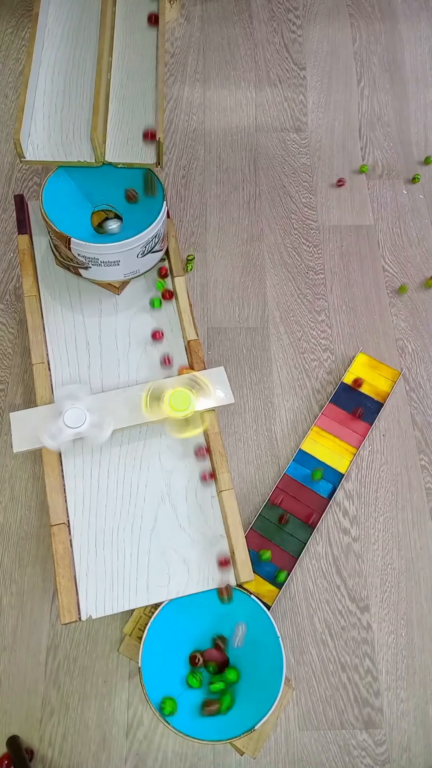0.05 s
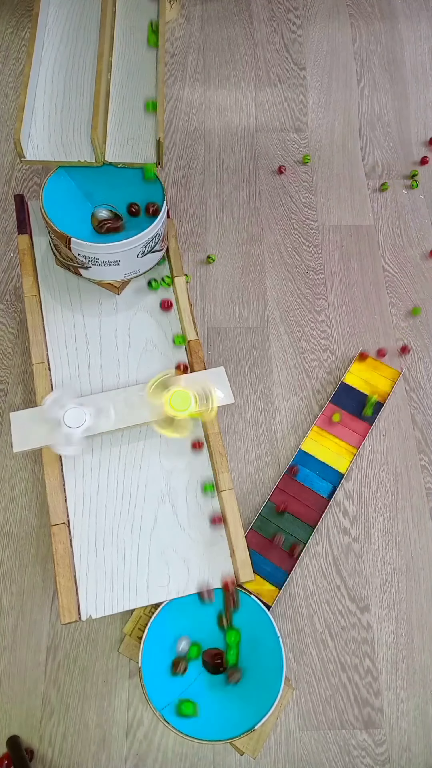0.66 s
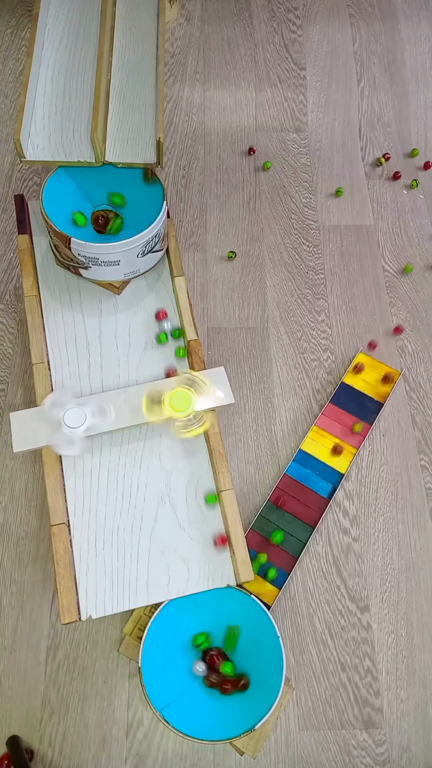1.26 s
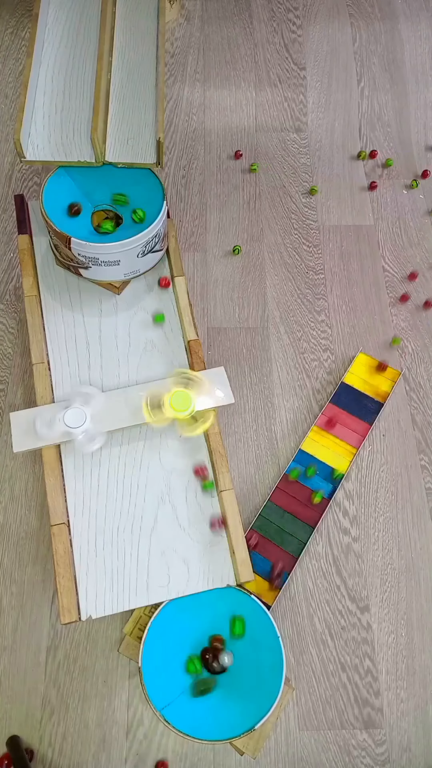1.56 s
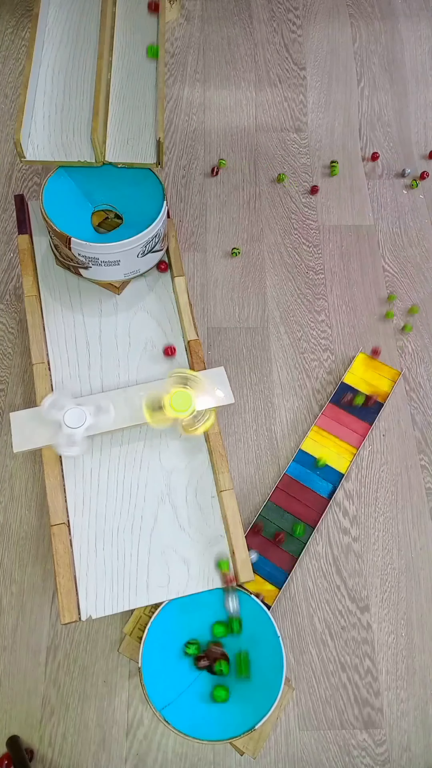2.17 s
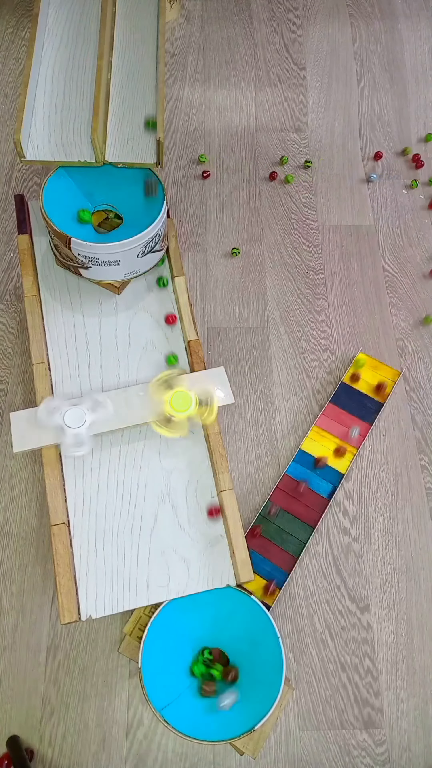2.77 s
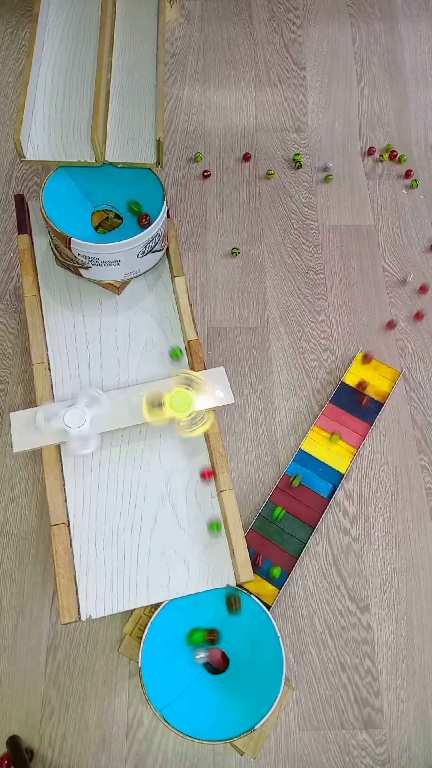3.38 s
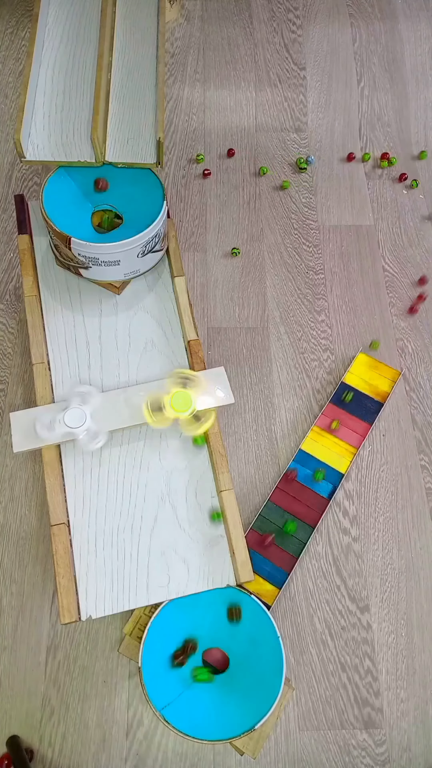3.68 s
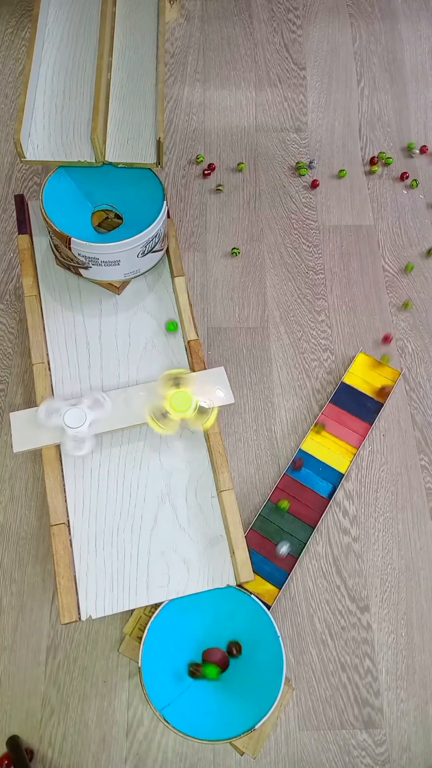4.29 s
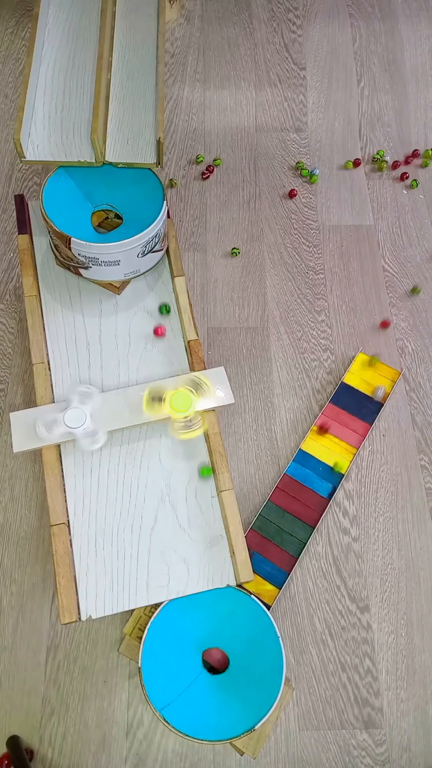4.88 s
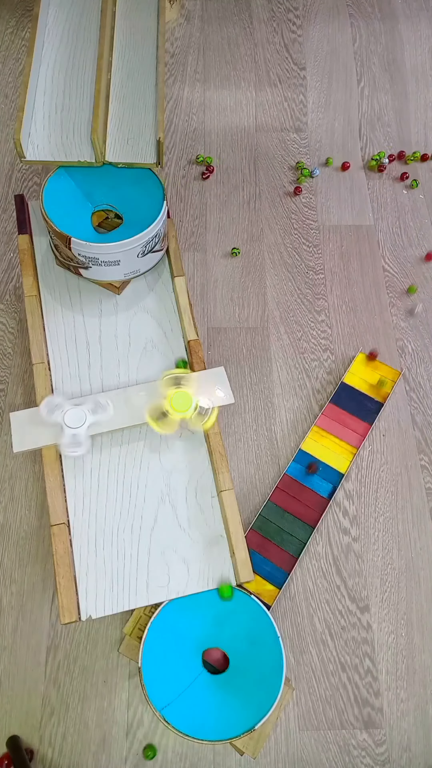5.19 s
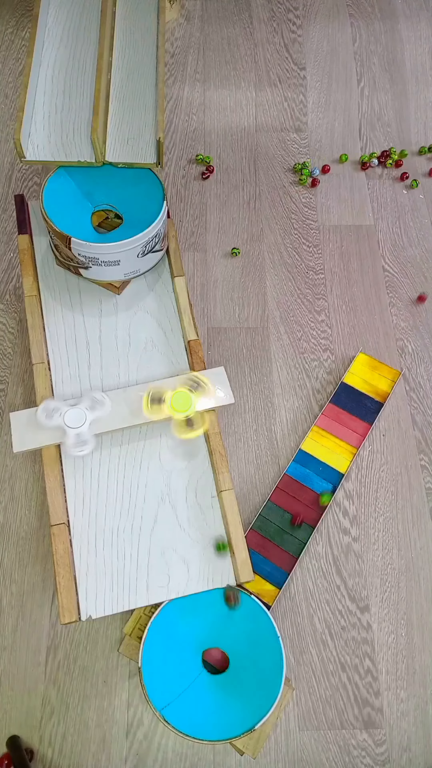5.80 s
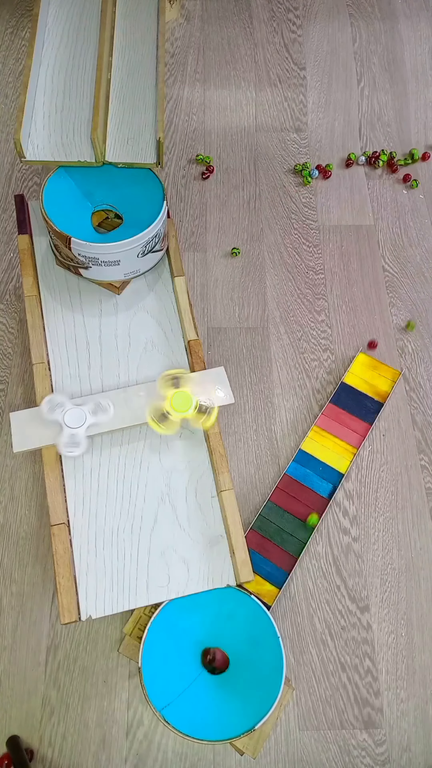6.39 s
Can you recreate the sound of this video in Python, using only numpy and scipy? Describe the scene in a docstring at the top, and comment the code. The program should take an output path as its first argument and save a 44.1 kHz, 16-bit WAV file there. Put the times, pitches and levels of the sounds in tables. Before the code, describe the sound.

From the start, many glass marbles rattle and roll down a homemade wooden run, heard fairly close in a small room. The loudest sounds are sharp, irregular clacks as they drop onto wooden blocks, each ringing very briefly at a slightly different pitch. Lighter taps mark the joints of a ramp, and underneath runs a light board rumble with a thin whirr. Marbles collide inside cardboard cups in flurries of high, glassy clicks, with a few faint hollow bumps, around 0.5, 1.9 and 4.7 seconds. The clatter is densest during the first 3 seconds and stays lively until about 4.8. Then the rolling dies down and the stream thins to stragglers: light taps from 5 to 5.5 seconds, a clear clack at 5.7, a small cluster of taps just after 6, and a few last knocks up to about 6.6. A very faint low hush lies behind everything.

```python
"""Glass marbles run down a homemade track of boards, wooden blocks and cardboard cups in a small room.
They drop onto three blocks, each ringing in its own modes, and tap over the joints of the ramp.
The grain of the boards makes them rumble and sing; they bump the cups, and each hard collision
in a cup sets off a flurry of clicks. The stream thins to a few stragglers over a faint hush."""
import sys
import numpy as np
from scipy import signal
from scipy.fft import rfft, irfft
from scipy.io import wavfile
from scipy.ndimage import uniform_filter1d, minimum_filter1d

SR = 44100
rng = np.random.default_rng(int(sys.argv[2]) if len(sys.argv) > 2 else 0)


def wrap_up_sound(samples):
    """Save the sound to the file named by the first command line argument, as 16-bit audio."""
    columns = np.atleast_2d(samples).T
    # keep every value between -1 and 1, then stretch to whole-number steps
    tamed = np.clip(columns, -1, 1)
    steps = np.round(tamed * 32767).astype(np.int16)
    wavfile.write(sys.argv[1], SR, steps)


N = 293265


def from_db(db):
    """Decibels to gain."""
    return 10 ** (np.asarray(db) / 20)


def unit_rms(x):
    """Scale to rms 1."""
    return x / np.sqrt(np.mean(x ** 2) + 1e-20)


def unit_energy(x):
    """Scale to energy 1."""
    return x / np.linalg.norm(x)


def at_hz(rows, hz):
    """Interpolate a table over log frequency."""
    known_hz, values = np.transpose(rows)
    return np.interp(np.log(np.maximum(hz, 1)), np.log(known_hz), values)


def in_time(rows):
    """Interpolate a table at every sample."""
    times_s, values = np.transpose(rows)
    return np.interp(np.arange(N) / SR, times_s, values)


def through(x, response):
    """Convolve with an impulse response."""
    return signal.oaconvolve(x, response)[:N]


def add(track, start_s, sound):
    """Mix a short sound into a track."""
    start = int(np.clip(round(start_s * SR), 0, N - 1))
    track[start:start + len(sound)] += sound[:N - start]


def body(spectrum, size=2048):
    """Minimum-phase impulse response with the given spectral shape; unit energy."""
    gain = from_db(at_hz(spectrum, np.fft.rfftfreq(size, 1 / SR)))
    cepstrum = irfft(np.log(gain))
    cepstrum[1:size // 2] *= 2
    cepstrum[size // 2 + 1:] = 0
    return unit_energy(irfft(np.exp(rfft(cepstrum))))


def surges(per_s):
    """Slow random curve through unit-variance knots."""
    knots = rng.standard_normal(int(per_s * N / SR) + 2)
    return np.interp(np.arange(N) / SR * per_s, np.arange(len(knots)), knots)


def grains(per_s, spread_db):
    """Random contacts of very uneven strength; rms 1."""
    hits = np.flatnonzero(rng.random(N) < per_s / SR)
    sizes = np.minimum(rng.exponential(1, N)[hits], 3.5)
    signs = np.sign(rng.random(N)[hits] - .5)
    force = np.zeros(N)
    force[hits] = signs * from_db(spread_db * sizes)
    return unit_rms(force)


def contact(chatter_db, swell_s, floor_db=-1, floor_s=.0031, size=1024):
    """First touch, its echo off the floor and the chatter of loose parts; unit energy."""
    age = np.arange(size) / SR / swell_s
    burst = rng.standard_normal(size) * age ** 2 * np.exp(-2 * age)
    force = from_db(chatter_db) * unit_energy(burst)
    force[0] += 1
    force[int(floor_s * SR * rng.uniform(.85, 1.15))] += from_db(floor_db)
    return unit_energy(force)


def stirred(steady_db, events, share_db, fade_s):
    """Level in dB with a flare after each event; flare energy falls to 1/e in fade_s."""
    kicks = np.zeros(N)
    for start_s, level_db, *_ in events:
        add(kicks, start_s, from_db([level_db + share_db]) ** 2)
    flares = signal.lfilter([1], [1, -np.exp(-1 / (fade_s * SR))], kicks)
    return 10 * np.log10(flares + from_db(steady_db) ** 2)


# Room decay. Each row: frequency in Hz, T60 in seconds.
ROOM_DECAY = [(150, 0.22), (800, 0.08), (2500, 0.33), (5500, 0.18), (10000, 0.26), (16000, 0.28)]
def room(dry, wet_db, onset_s, bands=12, size=26000):
    """Direct sound plus a diffuse tail that builds up and dies band by band."""
    t, hz = np.arange(size) / SR, np.fft.rfftfreq(size, 1 / SR)
    noise, tail = rfft(rng.standard_normal(size)), 0
    edges_hz = np.geomspace(40, SR / 2, bands + 1)
    for low, high in zip(edges_hz, edges_hz[1:]):
        band = irfft(noise * ((hz >= low) & (hz < high)))
        t60_s = at_hz(ROOM_DECAY, np.sqrt(low * high))
        tail += band * from_db(-60 * t / t60_s)
    tail *= 1 - np.exp(-(t / onset_s) ** 2)
    response = from_db(wet_db) * unit_energy(tail)
    response[0] += 1
    return through(dry, response)


# Background noise. Each row: frequency in Hz, gain in dB.
HUSH_SPECTRUM = [(25, -36), (100, -7.5), (300, 3.5), (1000, -23), (4000, -28), (16000, -42)]
def hush():
    """Faint, steady, low noise."""
    return from_db(-71) * through(rng.standard_normal(N), body(HUSH_SPECTRUM))


# Marbles under way. Each row: time in seconds, level in dB.
STREAM_LEVEL = [(0, -31.5), (0.13, -33.5), (0.25, -37), (0.42, -35), (0.58, -35.5), (0.69, -40.5),
                (0.8, -42.5), (1.2, -35.5), (1.55, -38.5), (2.45, -37.5), (2.69, -35), (2.78, -40),
                (2.95, -36.5), (3.04, -41.5), (3.68, -42), (4.3, -42), (4.75, -42), (5.25, -52),
                (5.55, -45.5), (5.9, -56.5), (6.15, -54), (6.65, -53)]
# Bumps on wood, rolling whirr, board thud, hollow board note. Each row: frequency in Hz, gain in dB.
RATTLE_SPECTRUM = [(300, -53.5), (1400, -10), (1900, -1.5), (2300, -3), (2900, 5), (3500, 0), (4200, -3.5),
                   (4600, -12), (5200, -18), (7000, -27.5), (16000, -40)]
WHIRR_SPECTRUM = [(150, -50), (1000, -22), (1900, -11), (2330, 0), (2600, -4), (3400, -11), (5000, -33),
                  (16000, -70)]
BOARD_SPECTRUM = [(40, -22), (120, -21), (230, -10.5), (330, 1), (450, 2.5), (640, 5.5), (850, 5.5),
                  (1200, 7), (1700, 0.5), (3000, -26.5), (16000, -103)]
HOLLOW_SPECTRUM = [(250, -32), (560, -10), (635, 3), (710, -7), (790, 0), (1100, -30)]
def rolling(stretches=3, max_bumps_per_s=105):
    """Marbles bump along the boards, shaken by the grain; each stretch has its own echoes."""
    # Marbles rattle on after a drop and skip after a joint.
    busy_db = stirred(in_time(STREAM_LEVEL), BLOCK_DROPS, share_db=-24.5, fade_s=.051)
    busy_db = stirred(busy_db, JOINT_TAPS, share_db=-21.5, fade_s=.024)
    rattle_db = busy_db - 4.5
    rolling_db = .67 * busy_db - 28   # fades more slowly than the rattle
    bumps_per_s = max_bumps_per_s * from_db(.58 * (busy_db - busy_db.max()))
    out = 0
    for _ in range(stretches):
        bumps = through(grains(bumps_per_s, spread_db=3.6), contact(chatter_db=-2, swell_s=.002))
        rattle = through(bumps, body(RATTLE_SPECTRUM))
        grain = grains(2500, spread_db=3) * from_db(3 * surges(18))
        whirr = from_db(3.5) * through(grain, body(WHIRR_SPECTRUM))
        rumble = through(grain + from_db(-2.5) * bumps, body(BOARD_SPECTRUM))
        crossings = from_db(7.5 * surges(8))   # swells as marbles cross mid-board
        hollow = from_db(-9) * through(unit_rms(grain * crossings), body(HOLLOW_SPECTRUM))
        dry = from_db(rattle_db) * rattle + from_db(rolling_db) * (whirr + rumble + hollow)
        out += room(dry, wet_db=-3.5, onset_s=.00024)
    return out / np.sqrt(stretches)


# Singing roll of single marbles. Each row: time in seconds, level in dB.
SINGING_LEVEL = [(0, -46), (2.9, -52.5), (3.7, -66), (4.8, -55), (5.25, -64), (5.55, -46), (5.9, -91),
                 (6.15, -55), (6.65, -84)]
def singing(centre_hz=2330, width_hz=300, wander=.035):
    """Wood grain keeps a rolling marble ringing in a narrow band that wanders as it travels."""
    grain = grains(700, spread_db=4) * from_db(4 * surges(25))
    envelope = signal.lfilter([1], [1, -np.exp(-np.pi * width_hz / SR)], grain)
    hz = centre_hz * (1 + wander * surges(14))
    carrier = np.sin(2 * np.pi * np.cumsum(hz) / SR)
    tone = unit_rms(through(envelope * carrier, body(WHIRR_SPECTRUM)))
    return room(from_db(in_time(SINGING_LEVEL)) * tone, wet_db=1, onset_s=.00086)


# Bumps against a cup. Each row: start in seconds, level in dB.
CARDBOARD_BUMPS = [(0.48, -44), (1.868, -42.5), (2.309, -51), (2.583, -50), (4.537, -44.5), (4.764, -42)]
# Cardboard knock. Each row: frequency in Hz, gain in dB.
CARDBOARD_SPECTRUM = [(60, -24), (200, -15), (340, 3.5), (550, 12), (900, 1), (2500, -25)]
def cup_bumps(gain_db=24):
    """Glass on cardboard: a dull, hollow knock."""
    force = np.zeros(N)
    for start_s, level_db in CARDBOARD_BUMPS:
        add(force, start_s, from_db([level_db + gain_db]))
    return room(through(force, body(CARDBOARD_SPECTRUM)), wet_db=-1, onset_s=.018)


# Hard marble-on-marble hits. Each row: start in seconds, level in dB.
COLLISIONS = [(0.018, -34), (0.118, -29), (0.1666, -31), (0.284, -31), (0.388, -37), (0.4144, -28.5),
              (0.432, -37), (0.449, -26), (0.4865, -26), (0.493, -32), (0.609, -29), (0.6658, -26),
              (0.6683, -30), (0.678, -26), (0.689, -36), (0.9068, -27.5), (0.9853, -33), (1.015, -25),
              (1.078, -22.5), (1.09, -32), (1.261, -27), (1.455, -35.5), (1.488, -33.5), (1.547, -33.5),
              (2.0968, -29), (2.133, -29), (2.1693, -31.5), (2.1858, -31), (2.26, -31), (2.2674, -32),
              (2.446, -31), (2.532, -33), (2.6337, -29), (2.6604, -31), (2.693, -31), (2.863, -35.5),
              (2.894, -31.5), (2.992, -30.5), (3.0078, -30), (3.1772, -38.5), (3.3695, -26), (3.925, -35),
              (3.9674, -26.5), (4.1827, -31.5), (4.381, -36), (4.394, -34), (4.636, -36.5), (4.828, -39),
              (5.3084, -34), (5.785, -36.5), (6.0132, -34.5), (6.277, -40.5)]
# Faint jostling in the cups. Each row: time in seconds, level in dB.
JOSTLE_LEVEL = [(0, -68), (0.7, -59), (1.4, -66), (1.75, -74), (2.1, -63), (2.6, -60.5), (3.0, -67),
                (3.55, -74), (4.1, -72), (4.6, -83), (4.95, -73.5), (5.5, -69.5), (5.9, -80.5), (6.65, -78)]
# Glass tick and jolted cup. Each row: frequency in Hz, gain in dB.
GLASS_SPECTRUM = [(100, -70), (1000, -16), (4000, -26), (6800, -7), (8000, -2.5), (8800, 3.5), (9250, 8),
                  (10000, -2.5), (12500, -7.5), (16000, -13)]
JOLT_SPECTRUM = [(25, -10), (60, 5), (130, 16.5), (400, 14), (2000, -50)]
def glass_clicks(click_db=11.5, rebound_db=6, jolt_db=-7, marbles=3):
    """Marbles of slightly different pitch collide, rebound, jolt the cup and set neighbours clicking."""
    jostle_db = stirred(in_time(JOSTLE_LEVEL), COLLISIONS, share_db=-45, fade_s=.027)
    marble = rng.integers(0, marbles, len(COLLISIONS))
    bunching = from_db(5 * surges(12))
    out = 0
    for k, pitch_ratio in enumerate(np.linspace(.985, 1.02, marbles)):
        force = from_db(jostle_db) * unit_rms(bunching * grains(42, spread_db=4))
        jolts = np.zeros(N)
        for start_s, level_db in np.array(COLLISIONS)[marble == k]:
            add(force, start_s, from_db([level_db + click_db]))
            add(jolts, start_s, from_db([level_db + jolt_db]))
            add(force, start_s + rng.uniform(.0039, .017), from_db([level_db + rebound_db]))
        force = through(force, contact(chatter_db=-9, swell_s=.0006, floor_db=-14))
        ticks = through(force, body(np.array(GLASS_SPECTRUM) * [pitch_ratio, 1]))
        cup = through(jolts, body(JOLT_SPECTRUM))
        out += room(ticks + cup, wet_db=-9.5, onset_s=.002)
    return out


def wood_ring(modes, swell_s, vary_db=2.6, detune=.004, size=6000):
    """Modes build up and decay, varying in level and pitch with the landing spot; unit energy."""
    hz, level_db, t60_s = np.transpose(modes)[:, :, None]
    t = np.arange(size) / SR
    signs = (-1) ** np.arange(len(hz))[:, None]
    gains = signs * from_db(level_db + vary_db * rng.standard_normal(hz.shape) - 60 * t / t60_s)
    hz = hz * (1 + detune * rng.standard_normal(hz.shape))
    ring = np.sum(gains * np.sin(2 * np.pi * hz * t), axis=0)
    ring *= 1 - np.exp(-t / swell_s)
    highpass = signal.butter(2, 1100, "high", fs=SR, output="sos")   # the ring carries no bass below about 1 kHz
    return unit_energy(signal.sosfilt(highpass, ring))


# Glass-on-wood clack. Each row: frequency in Hz, gain in dB.
CLACK_SPECTRUM = [(300, -62), (1300, -13.5), (1600, -1), (2100, 12), (3000, 2.5), (3700, 13), (4300, 4.5),
                  (4800, 0.5), (5400, -7.5), (7000, -17), (10000, -15.5), (16000, -103)]
def knocks(hits, modes, ring_db, clack_db, thud_db, swell_s, clack_wet_db,
           chatter_db=-3, lead_s=.0001, clack_slope=1, thud_slope=.76):
    """Glass on wood: ring, bright clack and board thud. Slopes in dB/dB make hard blows brighter."""
    clacks, close = np.zeros(N), np.zeros(N)
    wood, board = body(CLACK_SPECTRUM), body(BOARD_SPECTRUM)
    for start_s, level_db in hits:
        touch_s = start_s - lead_s
        force = contact(chatter_db, swell_s, floor_db=1)
        clack = unit_energy(signal.fftconvolve(force, wood))
        thud = unit_energy(signal.fftconvolve(force, board))
        add(clacks, touch_s, from_db(clack_slope * level_db + clack_db) * clack)
        add(close, touch_s, from_db(thud_slope * level_db + thud_db) * thud)
        add(close, touch_s + swell_s, from_db(level_db + ring_db) * wood_ring(modes, swell_s))
    return room(clacks, clack_wet_db, onset_s=.0095) + room(close, wet_db=-7.5, onset_s=.0093)


# Taps on the ramp joints. Each row: start in seconds, level in dB.
JOINT_TAPS = [(0.301, -19.5), (0.3486, -23), (0.4609, -17), (0.489, -18.5), (0.655, -12.5), (1.064, -17.5),
              (1.071, -16), (1.1429, -17.5), (1.283, -25), (1.417, -16.5), (2.529, -21), (2.586, -19),
              (2.6943, -26), (2.8814, -19.5), (2.932, -20), (3.531, -22), (3.728, -32), (3.882, -22),
              (4.045, -28), (4.3101, -19.5), (4.3214, -21), (4.5012, -20.5), (4.654, -19.5), (4.781, -26),
              (4.806, -27), (5.014, -21), (5.1135, -26.5), (5.161, -28.5), (5.1791, -29), (5.204, -30),
              (5.2802, -29), (5.346, -21.5), (5.3875, -28.5), (5.4435, -26.5), (5.472, -27.5),
              (6.055, -26.5), (6.069, -29), (6.118, -26), (6.131, -23), (6.171, -23), (6.245, -29.5)]
# Ramp modes. Each row: frequency in Hz, level in dB, T60 in seconds.
RAMP_RING = [(2050, -4, .012), (2320, 0, .018), (2600, -3, .012), (2900, -2, .016), (3200, -5, .012)]
def joint_taps():
    """Marbles cross the ramp joints with little chatter; soft taps are dull."""
    return knocks(JOINT_TAPS, RAMP_RING, ring_db=9.5, clack_db=15.5, thud_db=-10, swell_s=.0009,
                  clack_wet_db=-8, chatter_db=-8, clack_slope=1.43)


# End-block crack. Each row: frequency in Hz, gain in dB.
CRACK_SPECTRUM = [(3000, -30), (4900, 14), (6000, 7), (8000, -3), (9500, -20), (14000, -32)]
def cracks(gain_db=17, slope=1.83):
    """Drops on the end block add a brief, bright crack that grows faster than the blow."""
    force = np.zeros(N)
    for start_s, level_db in drops_on("end"):
        add(force, start_s, from_db(gain_db + slope * level_db) * contact(chatter_db=20, swell_s=.002))
    return room(through(force, body(CRACK_SPECTRUM)), wet_db=-4, onset_s=.0057)


def drops_on(block):
    """Start and level of each drop on one block."""
    return [(start_s, level_db) for start_s, level_db, name in BLOCK_DROPS if name == block]


# Drops onto the blocks; the row at 2.312 s is a quick return of the drop just before it. Each row: start in
# seconds, level in dB, block name.
BLOCK_DROPS = [(0.058, -16, "short"), (0.1115, -20, "end"), (0.188, -23, "short"), (0.5759, -19.5, "end"),
               (0.6985, -19, "short"), (0.805, -20.5, "short"), (0.822, -15.5, "short"),
               (0.8658, -16.5, "long"), (0.9269, -22.5, "long"), (0.987, -26, "end"), (1.008, -21.5, "end"),
               (1.176, -21, "short"), (1.196, -16.5, "short"), (1.272, -24.5, "end"),
               (1.3235, -14, "short"), (1.5782, -19.5, "long"), (1.6747, -18, "long"),
               (1.725, -19, "short"), (1.7585, -21, "long"), (1.8093, -16.5, "short"),
               (1.8306, -17, "long"), (1.893, -18.5, "long"), (1.9495, -20.5, "long"),
               (2.01, -18.5, "short"), (2.077, -25, "short"), (2.1028, -23, "long"),
               (2.192, -13.5, "short"), (2.297, -22.5, "end"), (2.312, -22.5, "end"), (2.3749, -22, "end"),
               (2.407, -25, "end"), (2.654, -24.5, "short"), (3.099, -18, "end"), (3.2257, -17, "long"),
               (3.2748, -18.5, "long"), (3.3733, -21.5, "long"), (3.443, -19.5, "long"),
               (3.4929, -26, "long"), (3.5694, -23, "end"), (3.704, -14.5, "short"), (3.834, -17.5, "long"),
               (3.9258, -19, "long"), (3.97, -18.5, "end"), (4.093, -18, "long"), (4.204, -13.5, "short"),
               (4.2705, -19.5, "short"), (4.5386, -22, "end"), (4.597, -22.5, "end"), (4.7014, -19, "end"),
               (4.9349, -22.5, "short"), (5.7104, -19.5, "short"), (5.9618, -32.5, "short"),
               (6.008, -27.5, "short"), (6.338, -20, "end"), (6.417, -30.5, "end"), (6.4687, -25.5, "end"),
               (6.6318, -39.5, "short")]
# Block modes. Each row: frequency in Hz, level in dB, T60 in seconds.
LONG_RING = [(1615, -15.8, 0.025), (1911, -3.5, 0.024), (1965, -2.5, 0.01), (2179, -10, 0.016),
             (2680, -5.2, 0.014), (2773, -4.5, 0.011), (3082, -6.2, 0.02), (3148, -8.3, 0.022),
             (3600, -9, 0.042), (3685, -5.3, 0.014), (4700, -15, 0.017)]
SHORT_RING = [(1935, -12, 0.014), (2329, -6, 0.011), (2461, -8, 0.016), (2665, -6, 0.011),
              (2865, -8, 0.016), (3088, 0.0, 0.025), (3350, -6.0, 0.034), (3405, -2, 0.012),
              (3652, -3, 0.011), (3745, -9.0, 0.014), (4013, -8, 0.01), (4688, -13, 0.012)]
END_RING = [(2073, -17, 0.016), (2370, -15, 0.016), (2830, -7, 0.02), (3600, -16, 0.012), (2930, 0, 0.015),
            (3050, -7, 0.016), (2945, -26, .11), (4195, -14, 0.01)]
def block_drops(echo_s=.02, echo_loss_db=8):
    """Falling marbles make three blocks chatter and ring; the end block echoes off nearby surfaces."""
    long_block = knocks(drops_on("long"), LONG_RING, ring_db=17.5, clack_db=13, thud_db=-8,
                        swell_s=.00077, clack_wet_db=-1.5)
    short_block = knocks(drops_on("short"), SHORT_RING, ring_db=15.5, clack_db=10, thud_db=-7,
                         swell_s=.00095, clack_wet_db=-3.5)
    end_block = knocks(drops_on("end"), END_RING, ring_db=18, clack_db=11.5, thud_db=-2.5,
                       swell_s=.00202, clack_wet_db=1.5, chatter_db=3.5, lead_s=.001305)
    returns = [(start_s + k * echo_s, level_db - k * echo_loss_db)
               for start_s, level_db in drops_on("end") for k in (1, 2)]
    blurred_echoes = knocks(returns, END_RING, ring_db=20, clack_db=-14, thud_db=-12,
                            swell_s=.0031, clack_wet_db=1, chatter_db=8, lead_s=0)
    return long_block + short_block + end_block + blurred_echoes


def scene():
    """Mono mix of wood, glass, hush and cardboard."""
    wood = block_drops() + joint_taps() + cracks() + singing() + rolling()
    return (wood + glass_clicks() + hush() + cup_bumps())[None]


def record(dry, ceiling_db=-13.9, window_samples=16, cutoff_hz=15650):
    """Fast limiter on the hardest knocks, then a steep low-pass."""
    allowed = np.minimum(1, from_db(ceiling_db) / (np.abs(dry) + 1e-9))
    gain = uniform_filter1d(minimum_filter1d(allowed, window_samples), window_samples)
    lowpass = signal.ellip(10, .1, 80, cutoff_hz, fs=SR, output="sos")
    return signal.sosfilt(lowpass, dry * gain)


dry = scene()
out = record(dry)
wrap_up_sound(out)
```